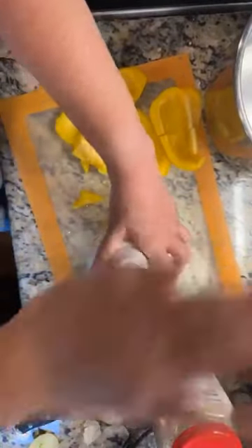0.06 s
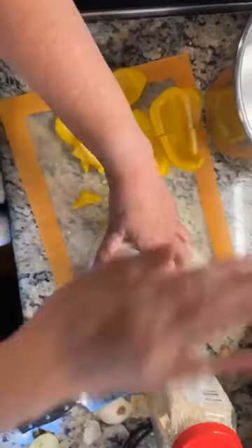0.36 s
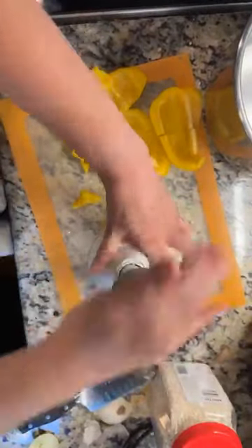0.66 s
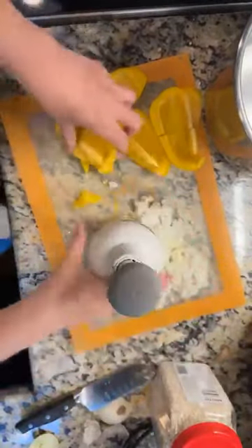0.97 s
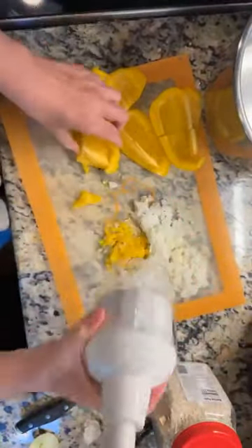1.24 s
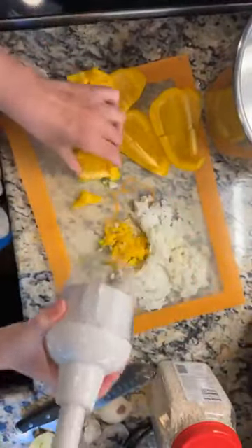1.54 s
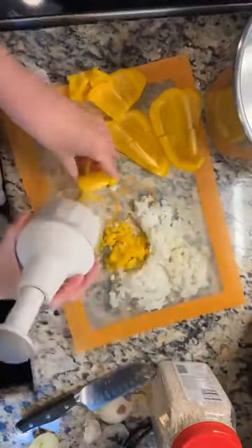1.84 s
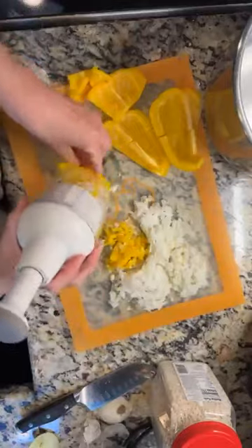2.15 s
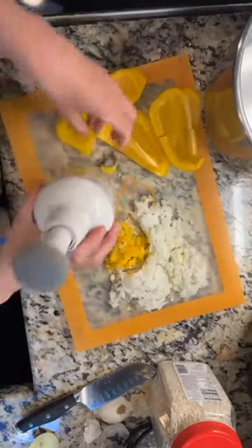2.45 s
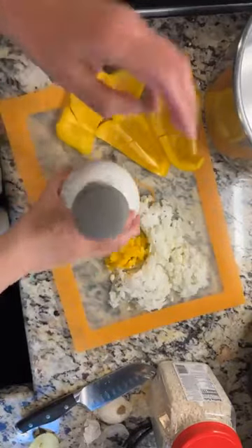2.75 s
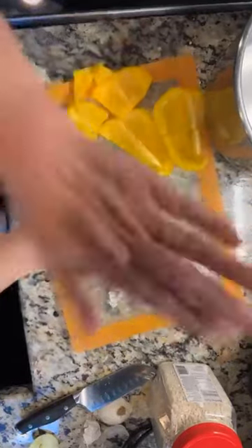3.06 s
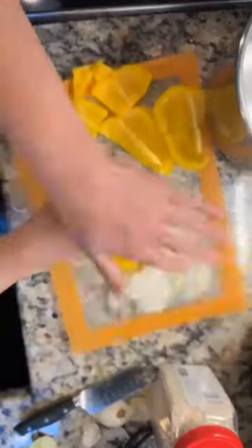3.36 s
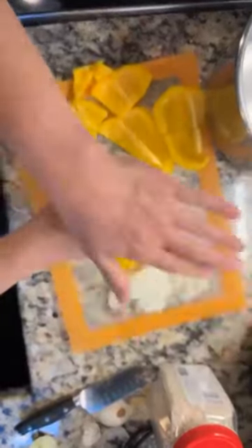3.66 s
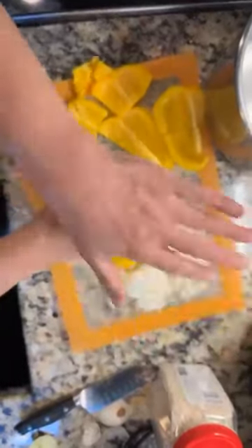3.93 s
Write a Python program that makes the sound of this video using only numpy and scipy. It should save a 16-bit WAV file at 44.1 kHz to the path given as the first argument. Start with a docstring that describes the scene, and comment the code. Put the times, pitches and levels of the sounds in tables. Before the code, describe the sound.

Close by in a slightly echoing kitchen, a plastic hand chopper cuts pepper with two clacking, thudding strokes. It is moved with a knock and soft rustling, then pounds five more times over a faint hum.

```python
"""On a stone kitchen counter, a spring-loaded plastic hand chopper works on a mat. Each stroke is a clack as
the palm meets the plunger, a crunching thud as the blades land, and a knock as the spring throws the plunger
back. Each hit cracks and rings the housing. Between two runs of strokes the chopper is lifted and set down in a
new place on the mat. The kitchen echoes a little and hums faintly."""
import sys
import numpy as np
from scipy import signal
from scipy.fft import rfft, irfft
from scipy.io import wavfile

SR = 44100
rng = np.random.default_rng(int(sys.argv[2]) if len(sys.argv) > 2 else 0)


def store_pcm(level_fs):
    """Save levels as 16-bit WAV."""
    pcm = np.round(np.clip(level_fs, -1, 1) * 32767).astype(np.int16)
    wavfile.write(sys.argv[1], SR, np.atleast_2d(pcm).T)


N = 176400
SIZE = 32768  # samples in one short sound
TIME_S = np.arange(SIZE) / SR
GRID_HZ = np.maximum(np.arange(SIZE // 2 + 1) * SR / SIZE, 1)

# The blades land. Each row: start in seconds, then level, bass, treble and housing ring in dB,
# burst fade time in seconds, counter thud in dB.
BLADE_LANDINGS = [(0.0201, -5, -4.5, -5.5, -2, 0.0076, 3.5), (0.302, 2, -1.5, -3, -6.5, 0.0078, 5.5),
                  (2.8775, -0.5, -8.5, -0.5, -10, 0.0091, 4.5), (3.145, -4.5, 3, -10, -27, 0.0072, -4.5),
                  (3.393, -8, 5.5, -8, 1.5, 0.0064, -3), (3.643, -0.5, 7, -10, 0, 0.0099, 3.5),
                  (3.8992, 0.5, -2.5, -1.5, -13, .005, 3.5)]


def from_db(db):
    """Turn decibels into a factor to multiply by."""
    return 10 ** (np.asarray(db) / 20)


def unit(x):
    """Scale to energy 1."""
    return x / np.sqrt(np.sum(x ** 2) + 1e-20)


def at_hz(points, hz, column=1):
    """Read between a table's rows, with frequency spaced in octaves."""
    table = np.array(points)
    return np.interp(np.log(hz), np.log(table[:, 0]), table[:, column])


def add(out, start_s, x):
    """Mix a sound in at its start time."""
    i = int(np.clip(start_s * SR, 0, N - 1))
    out[i:i + len(x)] += x[:N - i]


def colour(x, db):
    """Turn each frequency on GRID_HZ up or down, with no sound ahead of the hit (minimum phase)."""
    cepstrum = irfft(np.log(from_db(db)))
    cepstrum[1:SIZE // 2] *= 2
    cepstrum[SIZE // 2 + 1:] = 0
    response = irfft(np.exp(rfft(cepstrum)))
    return signal.fftconvolve(x, response)[:len(x)]


def shelves(bass_db, treble_db, bass_hz=320, treble_hz=3230):
    """Bass and treble controls, as a curve in dB."""
    return bass_db / (1 + (GRID_HZ / bass_hz) ** 4) + treble_db / (1 + (treble_hz / GRID_HZ) ** 4)


def ripple(width_hz=22):
    """Random peaks and dips along frequency, about 1 in size."""
    smoothing = unit(signal.windows.gaussian(SIZE // 10, width_hz * SIZE / SR))
    return signal.fftconvolve(rng.standard_normal(len(GRID_HZ)), smoothing, "same")


def ring(x, modes):
    """A struck object rings with its own fading tones, a little different in strength each time."""
    t = np.arange(SR // 5) / SR
    response = 0
    for k, (hz, db, fade_s) in enumerate(modes):
        envelope = from_db(db + 2 * rng.normal() - 60 * t / fade_s)
        response += (-1) ** k * envelope * np.sin(2 * np.pi * hz * t)
    return signal.fftconvolve(x, response)[:SIZE]


def grains(per_s, spread_db):
    """Random clicks of uneven size."""
    sizes = from_db(spread_db * np.minimum(rng.exponential(1, SIZE), 4))
    signs = rng.choice([-1, 1], SIZE)
    return sizes * signs * (rng.random(SIZE) < per_s / SR)


def kitchen_echo(x):
    """Add the room's echo; hands and chopper move, so each sound gets new reflections."""
    # Each row: frequency in Hz, seconds to fade by 60 dB, echo level in dB.
    room = [(80, 0.87, -8), (200, 0.26, -5.5), (550, 0.4, -5), (1500, 0.43, -5), (3750, .47, -8.5),
            (6210, .44, -2.5), (10100, 0.38, -10)]
    edges_hz = np.geomspace(50, 12800, 9)
    white, tail = rfft(rng.standard_normal(SIZE)), 0
    onset = np.clip((TIME_S - 0.0046) / 0.0014, 0, 1)  # the echo arrives a moment late
    for low, high in zip(edges_hz, edges_hz[1:]):
        centre_hz = np.sqrt(low * high)
        band = irfft(white * ((GRID_HZ >= low) & (GRID_HZ < high)))
        fade = from_db(-60 * TIME_S / at_hz(room, centre_hz))
        gain = np.sqrt(2 * (high - low) / SR) * from_db(at_hz(room, centre_hz, column=2))
        tail += gain * unit(band * onset * fade)
    return x + signal.fftconvolve(x, tail)[:SIZE]


def background(air_db=-63.5):
    """Low air noise and the faint hum of an appliance, there from the start."""
    # The air's tone. Each row: frequency in Hz, relative level in dB.
    air_colour = [(25, -27.5), (62, -4.5), (90, -8), (118, -3.5), (165, -14), (270, -6.5), (380, -7.5),
                  (480, -12), (620, -24), (800, -27), (1500, -31), (3500, -36), (8000, -46), (11000, -54)]
    # The appliance's tones. Each row: frequency in Hz, level in dB.
    hum_tones = [(269, -74), (377, -75), (474, -84), (581, -74)]
    t = np.arange(N) / SR
    air = np.sqrt(N) * unit(colour(rng.standard_normal(N), at_hz(air_colour, GRID_HZ)))
    hum = sum(from_db(db) * np.sin(2 * np.pi * (hz * t + rng.random())) for hz, db in hum_tones)
    return from_db(air_db) * air + np.sqrt(2) * hum


def hit_burst(rise_s, fade_s):
    """A dense burst of tiny clicks that swells and dies, giving each hit its short crack."""
    envelope = np.minimum(TIME_S / rise_s, 1) * np.exp(-np.maximum(TIME_S - rise_s, 0) / fade_s)
    burst = envelope * grains(per_s=4600, spread_db=3)
    for _ in range(3):  # even out the frequencies while keeping the burst short
        spectrum = rfft(burst)
        burst = irfft(spectrum / np.sqrt(np.abs(spectrum) + 1e-9)) * np.minimum(10 * envelope, 1)
    return unit(burst)


def plastic_hits(rows, tone, plastic, rise_s):
    """Each hit is a crack, shaped by the plastic's many small resonances, and it rings the housing."""
    # The housing's tones. Each row: frequency in Hz, level in dB, seconds to fade by 60 dB.
    housing_modes = [(374.4, -26, 0.083), (389, -36.5, 0.16), (523, -43, 0.053), (775, -36, .08),
                     (1034, -33, .08), (1098, -31, 0.079), (1573, -41, .06), (2163, -37, .08),
                     (2664, -48.5, .06), (4170, -42.5, .05)]
    cup_hz, cup_width_hz = 1096, 63
    kept = 0.15  # share of the resonance pattern that stays as the grip changes
    depth_db = 4 / (1 + (520 / GRID_HZ) ** 2)  # shallower in the bass
    out = np.zeros(N)
    for start_s, db, bass_db, treble_db, ring_db, fade_s, *_ in rows:
        burst = hit_burst(rise_s, fade_s)
        pattern = np.sqrt(kept) * plastic + np.sqrt(1 - kept) * ripple()
        peaks_db = depth_db * 2 * np.tanh(pattern / 2) - depth_db ** 2 / 10
        # The hollow cup sounds whenever the housing rings freely.
        cup_db = 7 * min(from_db(ring_db), 1.5) / (1 + ((GRID_HZ - cup_hz) / cup_width_hz) ** 2)
        crack = colour(burst, at_hz(tone, GRID_HZ) + shelves(bass_db, treble_db) + peaks_db + cup_db)
        ringing = from_db(ring_db) * ring(burst, housing_modes)
        add(out, start_s, from_db(db) * kitchen_echo(crack + ringing))
    return out


def palm_clacks(plastic):
    """The palm meets the plunger with a clack."""
    # Each row: start in seconds, then level, bass, treble and housing ring in dB,
    # burst fade time in seconds.
    presses = [(0.000, 1, 4.5, 0, -16, 0.0059), (0.284, 2.5, -6, -1.5, -7.5, 0.0082),
               (2.856, 3.5, 1, -6.5, 1.5, 0.013), (3.123, -2.5, 11, 5, -1, 0.027),
               (3.373, 2, 5.5, -4.5, -5, 0.016), (3.6245, -2.5, 13, 6.5, -15, 0.014),
               (3.881, -4, 12.5, -4, 4.5, 0.017)]
    # The clack's tone. Each row: frequency in Hz, boost in dB.
    tone = [(50, -2.5), (130, 8), (330, 11.5), (550, 5.5), (900, 2.5), (2000, 3), (4500, 10), (6800, 6.5),
            (8800, 6), (11000, -7.5)]
    return plastic_hits(presses, tone, plastic, rise_s=0.0047)


def blade_crunches(plastic):
    """The blades land on the pepper with a crunch."""
    # The crunch's tone. Each row: frequency in Hz, boost in dB.
    tone = [(50, 5.5), (110, 19.5), (220, 24.5), (420, 23), (630, 15), (800, 22.5), (1150, 9.5), (1700, 17),
            (2250, 17), (2900, 15), (5000, 11.5), (8000, 1), (11000, -6.5)]
    return plastic_hits(BLADE_LANDINGS, tone, plastic, rise_s=0.0064)


def counter_thuds(delay_s=0.009, push_s=0.0026):
    """The landing blades push through the soft mat and set the counter booming."""
    # The counter's tones. Each row: frequency in Hz, level in dB, seconds to fade by 60 dB.
    counter_modes = [(84.9, -32, 0.25), (125.5, -23.5, 0.15), (196.9, -19.5, 0.088), (238, -28.5, .08),
                     (361, -35.5, 0.14)]
    out = np.zeros(N)
    push = np.sin(np.pi * np.minimum(TIME_S / push_s, 1))
    for start_s, *_, thud_db in BLADE_LANDINGS:
        boom = ring(push / push.sum(), counter_modes)
        add(out, start_s + delay_s, from_db(thud_db) * kitchen_echo(boom))
    return out


def spring_knocks(plastic):
    """The spring throws the plunger back against its stop."""
    # Each row: start in seconds, then level, bass, treble and housing ring in dB,
    # burst fade time in seconds.
    returns = [(0.097, 0, -6.5, 2, -16, 0.0093), (0.424, -1, -0.5, 5, -15.5, .008),
               (2.9555, 8.5, -2, -1, -1, 0.0064), (3.228, 1, 0.5, -4.5, -5.5, 0.0087),
               (3.4805, 3.5, 0.5, -2.5, 1.5, 0.01), (3.7335, 1.5, -4, 2.5, -0.5, 0.0077)]
    # The knock's tone. Each row: frequency in Hz, boost in dB.
    tone = [(50, 9.5), (110, 9.5), (200, 10), (380, 21), (680, 10), (950, 8.5), (1900, 7.5), (4000, 9),
            (6500, 4.5), (9000, -2), (11000, -17.5)]
    return plastic_hits(returns, tone, plastic, rise_s=0.0045)


def cup_bumps(plastic):
    """The cup and the pepper bump about between the runs of strokes."""
    # Each row: start in seconds, then level, bass, treble and housing ring in dB,
    # burst fade time in seconds.
    bumps = [(0.700, -30, 5.5, -4, -15, 0.027), (1.040, -25.5, -38, -10, -13, .004),
             (1.522, -17.5, -19, 12, -10, 0.011), (1.5385, 2.5, 0.5, 0.5, -13, 0.0048),
             (2.031, -33.5, 13.5, 3, -18, 0.019), (2.226, -40.5, -3, 13.5, -23, 0.0069),
             (2.253, -10, -20, -3, -0.5, 0.0054)]
    # The bump's tone. Each row: frequency in Hz, boost in dB.
    tone = [(50, -6.5), (120, 15), (380, 17.5), (700, 13), (950, 2.5), (1300, 10), (2800, 5), (6500, -2),
            (11000, -20)]
    return plastic_hits(bumps, tone, plastic, rise_s=0.0058)


def rustles():
    """Fingers and pepper pieces rub on the mat and the cup, making swells of fine clicks."""
    # Each row: start and length in seconds, level and treble in dB.
    slides = [(0.757, 0.05, -62.5, 4.5), (0.804, 0.032, -66, 5.5), (0.87, 0.042, -62.5, 3.5),
              (0.999, 0.63, -66.5, -13.5), (1.943, .13, -71.5, 5), (2.306, .025, -55.5, 5),
              (2.409, 0.057, -57, 4.5), (2.3, 0.55, -60, -4), (2.562, 0.073, -62.5, 0),
              (2.786, 0.018, -60.5, 10.5), (2.813, 0.069, -57.5, 6)]
    # The rustle's tone. Each row: frequency in Hz, boost in dB.
    tone = [(200, 11), (500, 12.5), (1000, 3.5), (2300, 3.5), (5000, 2.5), (8000, -1.5), (11000, -15)]
    out = np.zeros(N)
    for start_s, length_s, db, treble_db in slides:
        swell = np.sin(np.pi * np.minimum(TIME_S / length_s, 1))
        friction = swell * np.sqrt(SIZE) * unit(grains(per_s=1500, spread_db=1.5))
        rustle = colour(friction, at_hz(tone, GRID_HZ) + shelves(0, treble_db) + 2 * ripple())
        add(out, start_s, from_db(db) * kitchen_echo(rustle))
    return out


def scene():
    """Mix the chopping, the handling and the background into one channel."""
    plastic = ripple()  # the plastic's own pattern of small resonances
    strokes = palm_clacks(plastic) + blade_crunches(plastic) + counter_thuds() + spring_knocks(plastic)
    handling = cup_bumps(plastic) + rustles()
    return (strokes + handling + background())[None]


def record(dry, low_hz=35, high_hz=10800):
    """The small microphone loses the deep bass; the highest treble is cut steeply."""
    bass_cut = signal.butter(2, low_hz, "high", fs=SR, output="sos")
    treble_cut = signal.ellip(10, .3, 80, high_hz, fs=SR, output="sos")
    return signal.sosfilt(treble_cut, signal.sosfilt(bass_cut, dry))


dry = scene()
out = record(dry)
store_pcm(out)
```